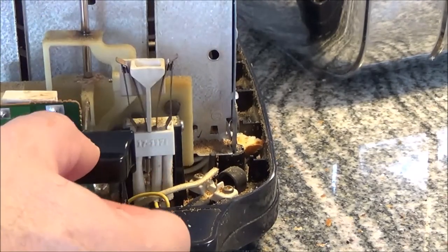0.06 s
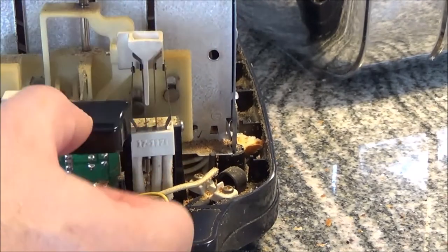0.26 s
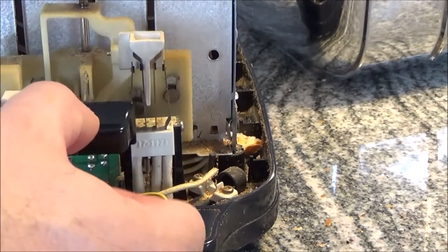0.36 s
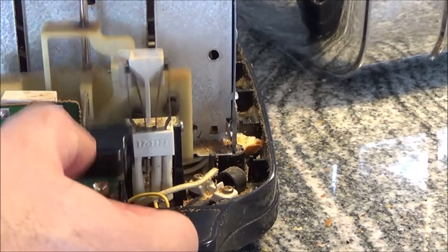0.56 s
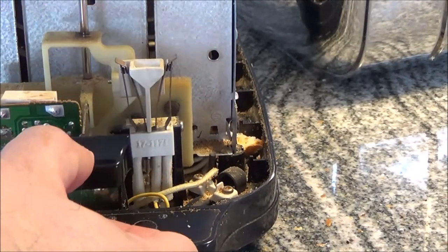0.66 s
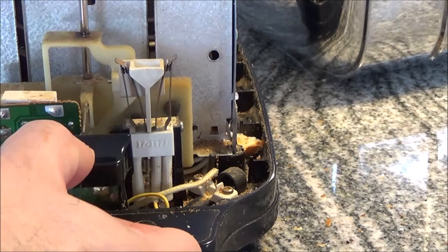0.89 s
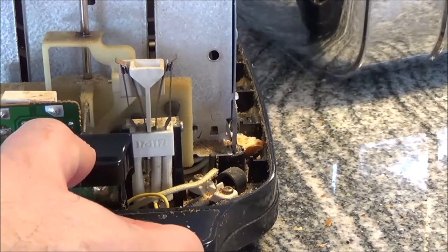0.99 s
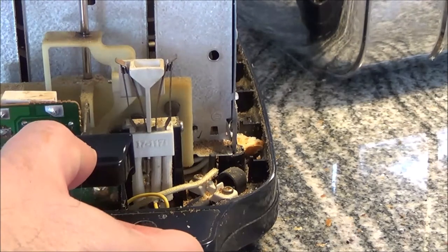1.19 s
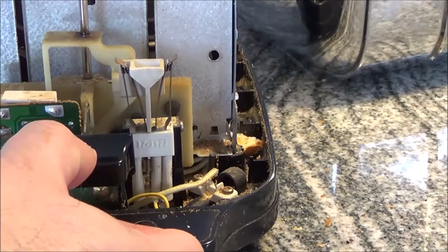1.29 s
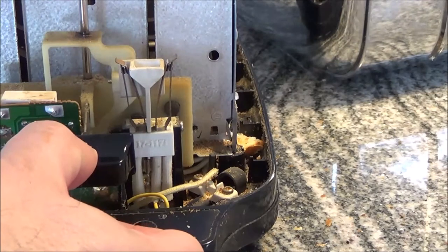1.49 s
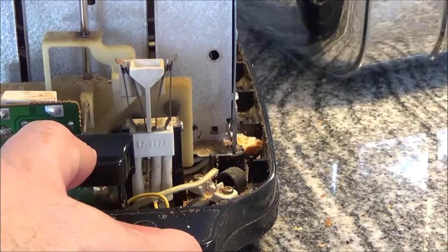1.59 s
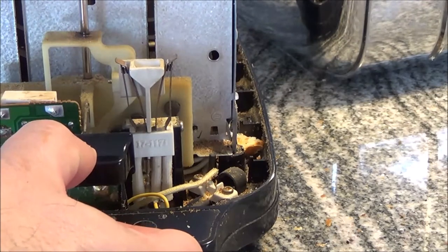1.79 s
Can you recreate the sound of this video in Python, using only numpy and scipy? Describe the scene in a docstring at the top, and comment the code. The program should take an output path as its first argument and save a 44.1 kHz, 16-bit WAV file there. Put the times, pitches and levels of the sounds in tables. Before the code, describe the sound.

A toaster lever clacks up, then clacks back down in a quiet kitchen.

```python
"""A toaster lever, worked by hand, close up in a quiet kitchen.
The latch slips and the carriage flies up and rattles against its top stop; pushed down again, it meets
the switch and lands on the bottom stop with a faint boom. Every contact is a clack that also rings the
steel carriage and frame, and the plastic guides rub in between. The kitchen answers the clacks over a
bed of hiss, low rumble and faint tones."""
import sys
import numpy as np
from scipy import signal
from scipy.fft import rfft, irfft, next_fast_len
from scipy.io import wavfile
from scipy.ndimage import uniform_filter1d

SR = 44100
rng = np.random.default_rng(int(sys.argv[2]) if len(sys.argv) > 2 else 0)


def unload_wav(signal):
    """Save mono or channel-first audio to the path in sys.argv[1] as 16-bit WAV at rate SR, clipped to [-1, 1]."""
    wavfile.write(
        sys.argv[1],
        SR,
        np.round(np.clip(np.atleast_2d(signal).T, -1, 1) * 32767).astype(np.int16),
    )


N = 81585

# The lever's hits; knock and tick tilt the clack, the last two are sends to the ringing steel:
# start_s, level_db, knock_db, tick_db, clack_t60_s, carriage_send_db, frame_send_db
LEVER_HITS = [(0.034, -51, 17.5, 1.5, 0.05, -77, -53), (0.2077, -11.5, -6.5, 0, 0.021, -28, -60),
              (0.2124, -12.5, 1, -23, 0.037, -33, -57), (0.2154, -19, 7, -10, 0.012, -47, -55),
              (0.2217, -16, 0, 12, 0.057, -35, -49), (0.2275, -20.5, -4.5, 12, 0.044, -28, -58),
              (0.2318, -15, -1.5, 3, 0.041, -26, -54), (0.237, -16, -5, 6, 0.068, -47, -59),
              (0.2411, -5.5, -10.5, -14.5, 0.049, -18.5, -50),
              (0.2442, -11.5, -10, -2.5, 0.048, -26.5, -26), (0.2535, -14, -6.5, 4, 0.07, -33, -65),
              (0.2565, -15, 0.5, 4, 0.075, -33, -62), (0.2618, -18.5, -5, 10, 0.081, -35, -49),
              (0.3480, -23, 2.5, -3.5, 0.03, -46, -60), (0.4472, -27, -18, -12, 0.018, -59, -72),
              (0.4772, -39, -4, 12, 0.033, -61, -68), (0.4796, -24.5, 1, -6, 0.062, -48, -54),
              (0.4829, -25, 3, 4.5, 0.063, -63, -69), (0.4936, -15, -3, 0, 0.073, -52, -42),
              (0.5017, -16, -3, -1, 0.037, -34, -50), (0.506, -18, -1, -3, 0.038, -36, -63),
              (0.512, -24.5, 4, 6, 0.022, -50, -47), (0.5829, -19, -0.5, -6, 0.065, -54, -46),
              (0.5852, -20, 7, 2, 0.038, -54, -32), (0.5882, -20.5, -5, 10.5, 0.035, -34, -23.5),
              (0.5925, -12.5, -1.5, 8, 0.052, -29, -38), (0.5991, -17, 6.5, 2, 0.069, -57, -30),
              (0.6078, -14.5, 2, 4.5, 0.071, -37.5, -29.5), (0.6165, -20.5, -11, -0.5, 0.23, -36, -32)]
# Resonances that colour the clacks at the top stop: centre_hz, half_width_hz, gain_db
TOP_STOP_EQ = [(100, 540, -2.5), (2057, 140, -7), (3070, 610, 3.5), (5540, 350, 4.5), (11960, 200, 6.5)]
# The same on the way down: centre_hz, half_width_hz, gain_db
BOTTOM_STOP_EQ = [(1200, 60, 7.2), (4880, 170, 2.8), (5490, 70, 5.7), (10900, 140, 1.4)]
# The latch slipping off, a bright tick and a hollow knock: pitch_hz, level_db, t60_s
LATCH_MODES = [(1635, -19, 0.014), (5170, -16, 0.015), (9750, -5, 0.0058), (10500, -3, 0.0052)]
# Ring of the sprung steel carriage: pitch_hz, gain_db, t60_s
CARRIAGE_MODES = [(722, -14, 0.56), (828, -19, 0.55), (2440, -10, 0.56), (2847, 4, 0.12), (2896, -10, 0.42),
                  (3098, 0, 0.15), (3297, -8, .42), (5198, -7, 0.4), (5302, -1, 0.17), (5607, -6, 0.48),
                  (5700, -8, 0.48), (5878, -3, 0.38), (12445, 2, 0.1)]
# Ring of the sheet-steel frame: pitch_hz, gain_db, t60_s
FRAME_MODES = [(827, -7, 0.78), (1238, -11, 0.5), (1266, -11, .5), (1628, -10, .54), (2309, -8, 0.45),
               (2525, -9, 0.48), (4500, 1, 0.32), (4565, 2, 0.17), (5081, 3, 0.22), (5525, -2, 0.36)]
# The toaster's slight lean in the stereo image: freq_hz, left_over_right_db
TOASTER_PAN = [(200, -0.091), (2500, 0.82), (13000, 0.1)]
LATCH_S, DOWNSTROKE_S = 0.2072, 0.46
CARRIAGE_TRIM_DB, FRAME_TRIM_DB = -7.5, -11


def lever():
    """The latch lets go; each contact clacks, echoes in the kitchen and rings carriage and frame."""
    out = np.zeros((2, N))
    latch = ring(LATCH_MODES)
    add(out, LATCH_S, latch)
    add(out, LATCH_S, kitchen(latch))
    for start_s, level_db, knock_db, tick_db, t60_s, *_ in LEVER_HITS:
        stop_eq = TOP_STOP_EQ if start_s < DOWNSTROKE_S else BOTTOM_STOP_EQ
        hit = amp(level_db) * clack(knock_db, tick_db, t60_s, stop_eq)
        add(out, start_s, hit)
        add(out, start_s, kitchen(hit.mean(0)))
    starts_s, *_, carriage_send_db, frame_send_db = np.transpose(LEVER_HITS)
    out += steel(CARRIAGE_MODES, starts_s, CARRIAGE_TRIM_DB + carriage_send_db)
    out += steel(FRAME_MODES, starts_s, FRAME_TRIM_DB + frame_send_db)
    out += guide_rubs() + pings()
    return filtered(out, lambda hz: amp(np.outer([1, -1], along(TOASTER_PAN, hz)) / 2))


# Tone of plastic and steel knocking together: freq_hz, gain_db
CLACK_EQ = [(40, -49), (130, -27.5), (400, -21.5), (600, -19), (800, -12.5), (1050, -15), (1550, -5.5),
            (2400, -3.5), (3600, -6.5), (5000, -3), (7800, -11.5), (10500, -8), (13000, -11), (14800, -20),
            (16000, -45)]
# Stereo width of the dry clack: freq_hz, side_db
CLACK_WIDTH = [(300, -37), (800, -25), (3000, -17.5), (8000, -18), (12000, -35)]
KNOCK_HZ, MID_HZ, TICK_HZ = 1220, 3400, 10900
CRACK_DB, CRACK_T60_S, ATTACK_S = -2.5, 0.0017, 0.00016


def clack(knock_db, tick_db, t60_s, resonances):
    """One contact: a crack, then plastic and steel ringing so densely that it is a burst of noise."""
    t = np.arange(SR // 5) / SR
    body = amp(-60 * t / t60_s)
    crack = amp(CRACK_DB - 60 * t / CRACK_T60_S)
    envelope = (body + crack) * (1 - np.exp(-t / ATTACK_S))
    burst = envelope * stereo_noise(len(t), CLACK_WIDTH)
    hardness = [(KNOCK_HZ, knock_db), (MID_HZ, 0), (TICK_HZ, tick_db)]

    def colour(hz):
        peaks_db = sum(db / (1 + ((hz - centre) / width) ** 2) for centre, width, db in resonances)
        return unit(amp(along(CLACK_EQ, hz) + peaks_db)) * amp(along(hardness, hz))

    return np.array([minimum_phase(channel, colour) for channel in burst])


LINE_WIDTH_HZ = 5.4  # loose joints blur every mode


def steel(modes, starts_s, levels_db):
    """A steel part: every blow adds energy to its modes, which drain at their own rates."""
    blows = np.bincount(np.round(starts_s * SR).astype(int), amp(levels_db) ** 2, N)
    out = np.zeros(N)
    for pitch_hz, gain_db, t60_s in modes:
        energy_kept = amp(-60 / (t60_s * SR)) ** 2
        energy = signal.lfilter([1], [1, -energy_kept], blows)
        swing = uniform_filter1d(np.sqrt(energy), size=32, origin=15)  # softens each onset
        phase_drift = np.cumsum(rng.standard_normal(N)) * np.sqrt(2 * np.pi * LINE_WIDTH_HZ / SR)
        out += amp(gain_db) * swing * np.sin(2 * np.pi * pitch_hz * np.arange(N) / SR + phase_drift)
    return out


def ring(modes):
    """A small part struck once: each mode is a dying sine."""
    t = np.arange(SR // 5) / SR
    pitch_hz, level_db, t60_s = np.transpose(modes)[..., None]
    phase = 2 * np.pi * (pitch_hz * t + rng.random(pitch_hz.shape))
    partials = amp(level_db - 60 * t / t60_s) * np.sin(phase)
    return partials.sum(0) * (1 - np.exp(-t / ATTACK_S))


# Small parts pinging on top of the clacks: start_s, pitch_hz, level_db, t60_s
PING_HITS = [(0.2123, 824, -26, 0.025), (0.2112, 2820, -20, 0.025), (0.4798, 3700, -24.5, 0.021),
             (0.5017, 12600, -19, 0.037), (0.593, 11200, -12, 0.011)]


def pings():
    """Pins, wires and catches ring for an instant when a contact jolts them."""
    out = np.zeros(N)
    for start_s, *mode in PING_HITS:
        add(out, start_s, ring([mode]))
    return out + kitchen(out)[:, :N]


# Slides in the plastic guides: peak_s, rise_s, level_db, tilt_db_per_octave
GUIDE_RUBS = [(0.2064, 0.012, -33.5, 0.5), (0.583, 0.008, -25, -2.5), (1.836, 0.052, -52, -18)]
RUB_RELEASE_S = 0.0059  # rise and release are times per 20 dB


def guide_rubs():
    """The lever rubs in its guides: gritty friction that swells and stops short."""
    out, t = np.zeros(N), np.arange(N) / SR
    for peak_s, rise_s, level_db, tilt in GUIDE_RUBS:
        grit = rng.standard_normal(N) * rng.exponential(size=N)
        rub = filtered(grit, lambda hz: amp(along(CLACK_EQ, hz) + tilt * np.log2(1 + hz / KNOCK_HZ)))
        fade_db = 20 * np.maximum((peak_s - t) / rise_s, (t - peak_s) / RUB_RELEASE_S)
        out += amp(level_db - fade_db) * unit(rub)
    return out


BOOM_START_S, BOOM_HZ, BOOM_DB, BOOM_T60_S, BOOM_RISE_S = 0.594, 133.4, -45, 1, 0.013


def landing_boom():
    """The landing sets off one low, long resonance."""
    out, t = np.zeros(N), np.arange(N) / SR
    envelope = amp(BOOM_DB - 60 * t / BOOM_T60_S) * (1 - np.exp(-t / BOOM_RISE_S))
    add(out, BOOM_START_S, envelope * np.sin(2 * np.pi * BOOM_HZ * t))
    return out


# Decay of the kitchen reverb: freq_hz, t60_s
REVERB_DECAY = [(150, 0.32), (700, 0.73), (2000, 0.66), (5000, 0.62), (8000, 0.35), (12000, 0.33)]
# Its tone: freq_hz, gain_db
REVERB_EQ = [(60, 5), (180, 12), (320, 10.5), (800, 4.5), (2000, 0), (5000, -6.5), (8000, 4), (13000, -7.5)]
# Its stereo width: freq_hz, side_db
REVERB_WIDTH = [(100, -60), (500, -12), (4000, -7.5), (9000, -11.5), (14000, -45)]
REVERB_SEND_DB, REVERB_BUILD_S = -6.5, 0.002


def kitchen(x):
    """Reverb off the counter and walls, wet only; the mids hang on longest."""
    freq_hz, t, bands = signal.stft(stereo_noise(SR * 3 // 4, REVERB_WIDTH), SR, nperseg=256)
    decay = amp(-60 * t / along(REVERB_DECAY, freq_hz)[:, None])
    tail = signal.istft(bands * decay, SR, nperseg=256)[1]
    tail = filtered(tail / np.linalg.norm(tail[0]), lambda hz: amp(along(REVERB_EQ, hz)))
    build_up = 1 - np.exp(-np.arange(tail.shape[1]) / SR / REVERB_BUILD_S)
    return amp(REVERB_SEND_DB) * signal.fftconvolve(x[None], tail * build_up, axes=1)


# Tone of the hiss: freq_hz, gain_db
HISS_EQ = [(25, -13), (70, -17), (125, -10.5), (180, -12), (320, -4.5), (500, -7), (1700, -8.5),
           (8000, -13), (15500, -17.5)]
# Tone of the rumble: freq_hz, gain_db
RUMBLE_EQ = [(30, -36), (200, -16.5), (350, -9), (1500, -20), (5000, -47)]
# Slow fader ride on the rumble: time_s, level_db
RUMBLE_RIDE = [(0, -59), (.15, -67), (1.08, -70), (1.32, -59), (1.62, -63.5), (1.83, -60.5)]
# Stereo width of hiss and rumble: freq_hz, side_db
BED_WIDTH = [(200, -15), (600, -2), (2000, 0.5), (10000, -14.5)]
# A low hum and two thin whines: pitch_hz, level_db
BED_TONES = [(120, -72), (3314, -72), (15736, -61)]
HISS_DB = -54


def room_tone():
    """The bed: steady hiss, drifting low room noise and faint tones."""
    t = np.arange(N) / SR
    hiss = unit(filtered(stereo_noise(N, BED_WIDTH), lambda hz: amp(along(HISS_EQ, hz))))
    rumble = unit(filtered(stereo_noise(N, BED_WIDTH), lambda hz: amp(along(RUMBLE_EQ, hz))))
    rumble_db = np.interp(t, *np.transpose(RUMBLE_RIDE))
    tones = sum(amp(level_db) * np.sin(2 * np.pi * pitch_hz * t) for pitch_hz, level_db in BED_TONES)
    return amp(HISS_DB) * hiss + amp(rumble_db) * rumble + tones


def amp(db):
    """Decibels to gain."""
    return 10 ** (np.asarray(db) / 20)


def unit(x):
    """Scale to rms 1."""
    return x / np.sqrt(np.mean(x ** 2) + 1e-20)


def along(curve, hz):
    """Read a curve of (freq_hz, value) points on a log frequency axis."""
    freq_hz, values = np.transpose(curve)
    return np.interp(np.log(hz + 1), np.log(freq_hz + 1), values)


def filtered(x, response):
    """Zero-phase EQ with the gain response(hz)."""
    n = x.shape[-1]
    size = next_fast_len(n + 8192)
    return irfft(rfft(x, size) * response(np.fft.rfftfreq(size, 1 / SR)), size)[..., :n]


def minimum_phase(x, response):
    """EQ with no pre-ring, so attacks stay sharp."""
    size = 2 * len(x)
    gain = np.maximum(response(np.fft.rfftfreq(size, 1 / SR)), 1e-6)
    cepstrum = irfft(np.log(gain))
    cepstrum[1:size // 2] *= 2
    cepstrum[size // 2 + 1:] = 0
    return irfft(rfft(x, size) * np.exp(rfft(cepstrum)))[:len(x)]


def add(out, start_s, x):
    """Mix x into out at start_s."""
    i = round(start_s * SR)
    n = min(x.shape[-1], N - i)
    out[..., i:i + n] += x[..., :n]


def stereo_noise(size, width):
    """White noise in the middle, with sides shaped by the width curve."""
    mid, side = rng.standard_normal((2, size))
    side = filtered(side, lambda hz: amp(along(width, hz)))
    return np.array([mid + side, mid - side])


def scene():
    """The toaster in the quiet kitchen."""
    return lever() + landing_boom() + room_tone()


CEILING, LOW_CUT_HZ, HIGH_CUT_HZ = 0.95, 79, 16000


def record(dry):
    """Master chain: soft-clip the highest peaks, roll off the deep bass, cut the very top steeply."""
    rounded = dry / (1 + np.abs(dry / CEILING) ** 6) ** (1 / 6)
    low_cut = signal.butter(2, LOW_CUT_HZ, "highpass", fs=SR, output="sos")
    thinned = signal.sosfilt(low_cut, rounded)
    return filtered(thinned, lambda hz: 1 / np.sqrt(1 + (hz / HIGH_CUT_HZ) ** 160))


dry = scene()
out = record(dry)
unload_wav(out)
```